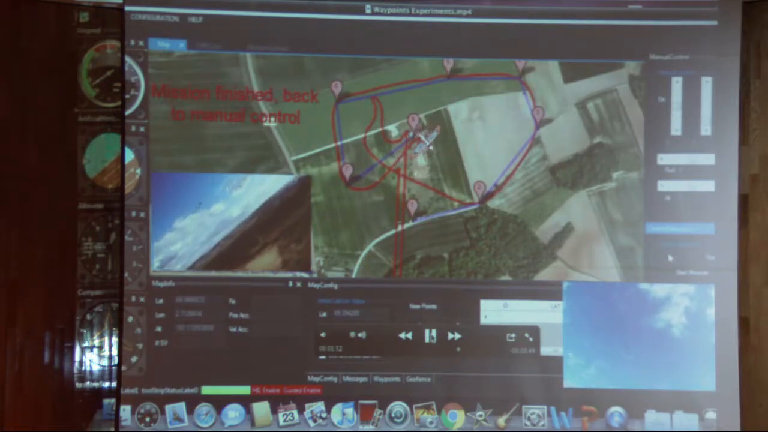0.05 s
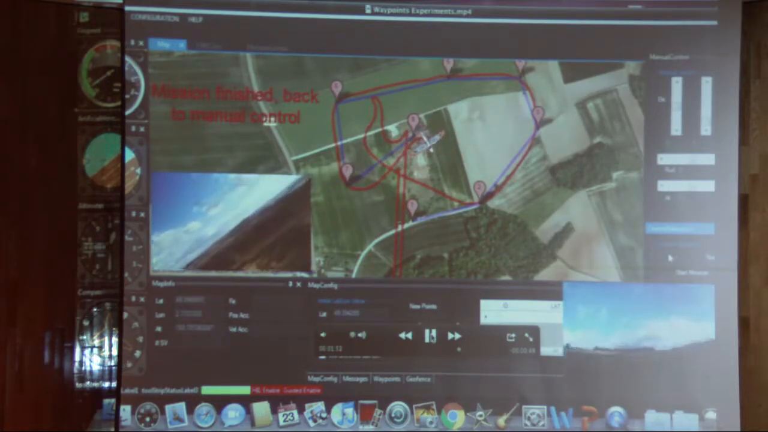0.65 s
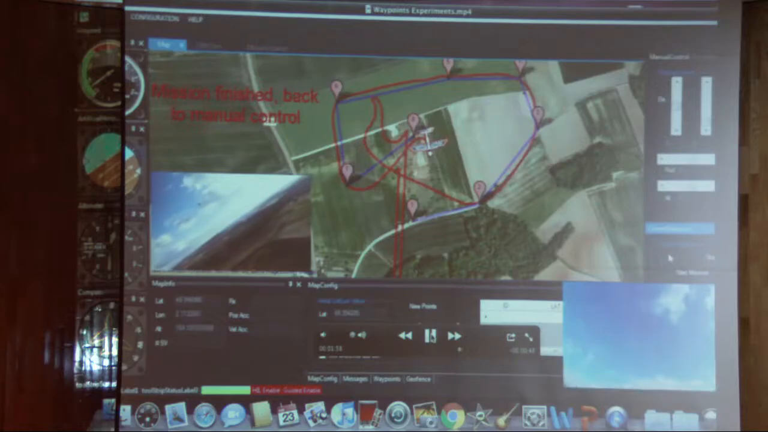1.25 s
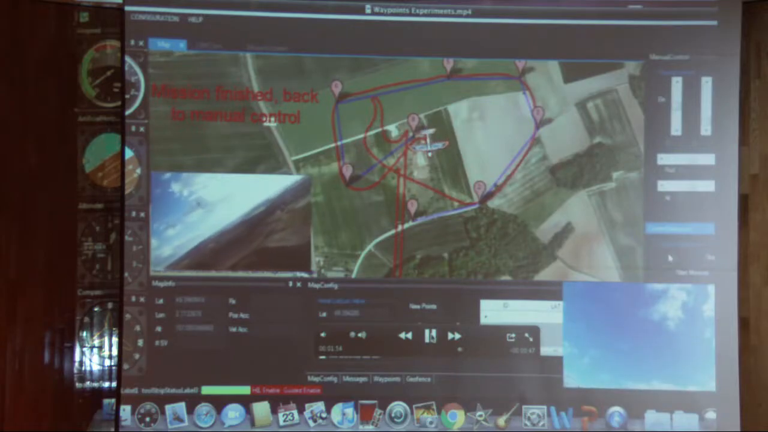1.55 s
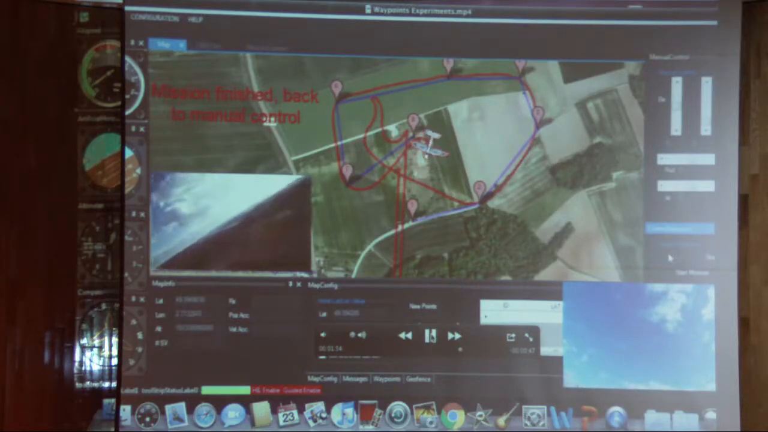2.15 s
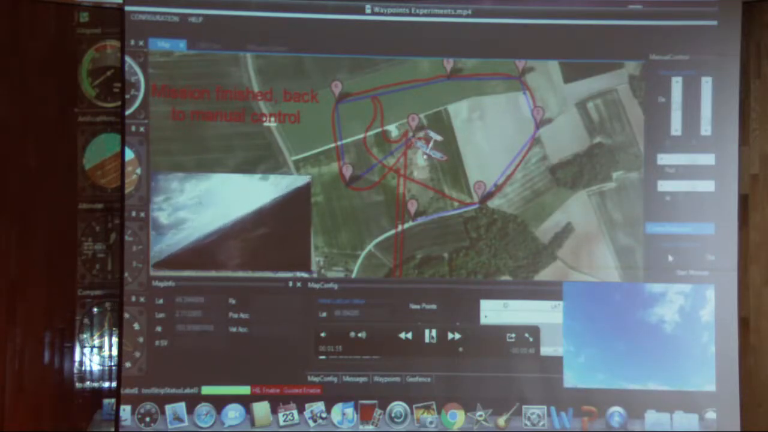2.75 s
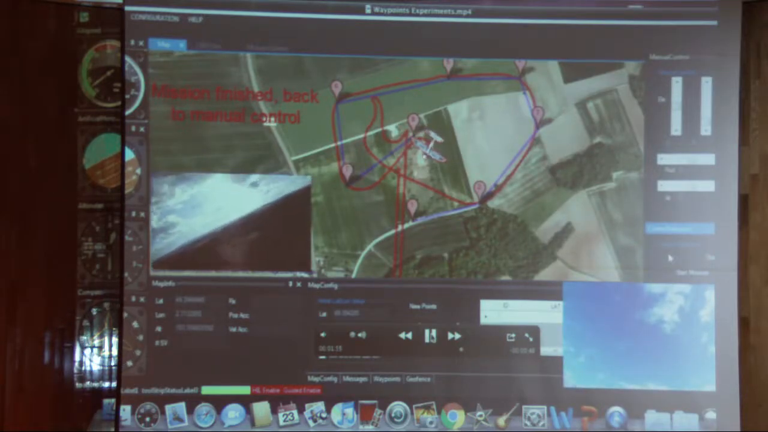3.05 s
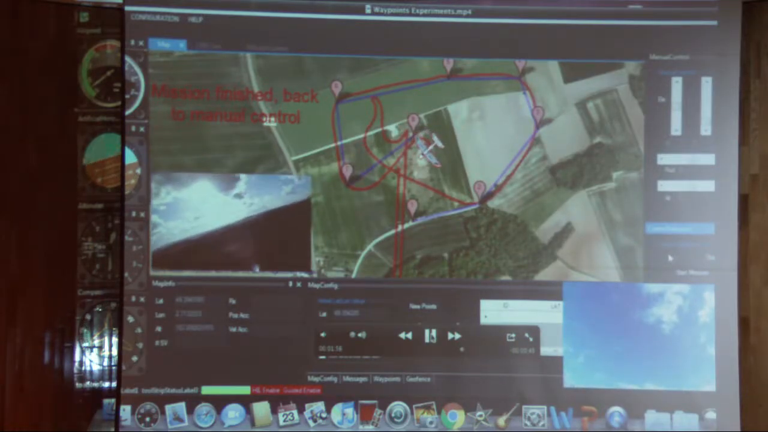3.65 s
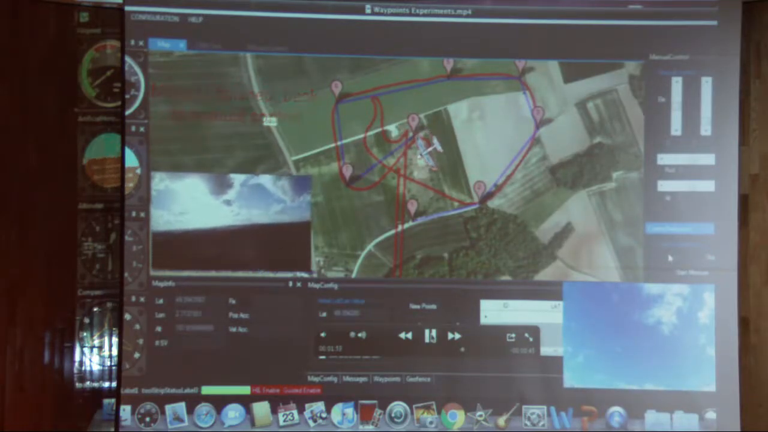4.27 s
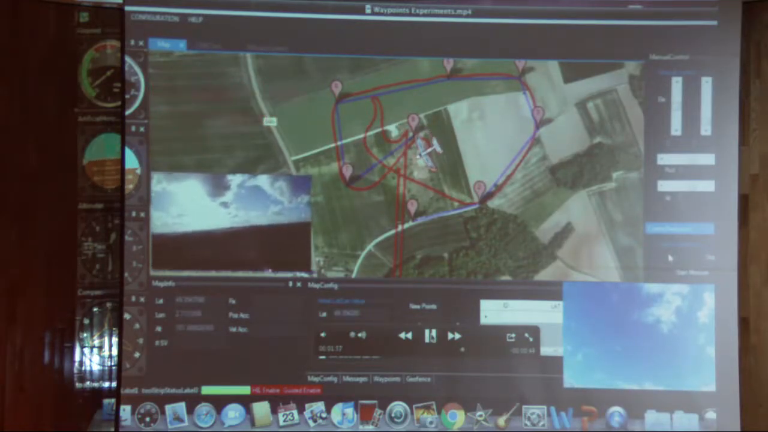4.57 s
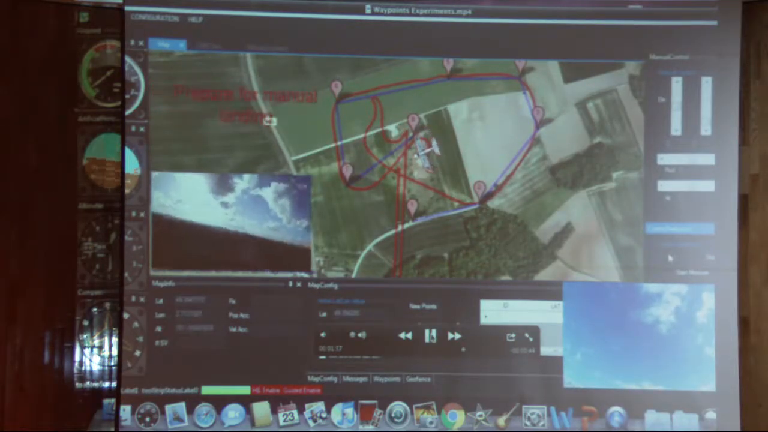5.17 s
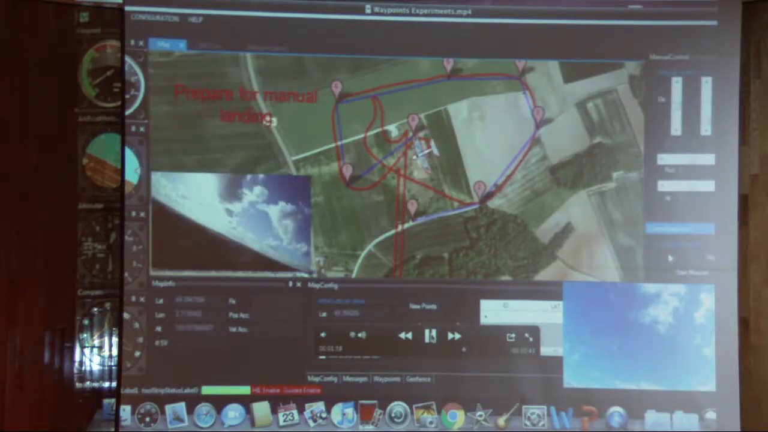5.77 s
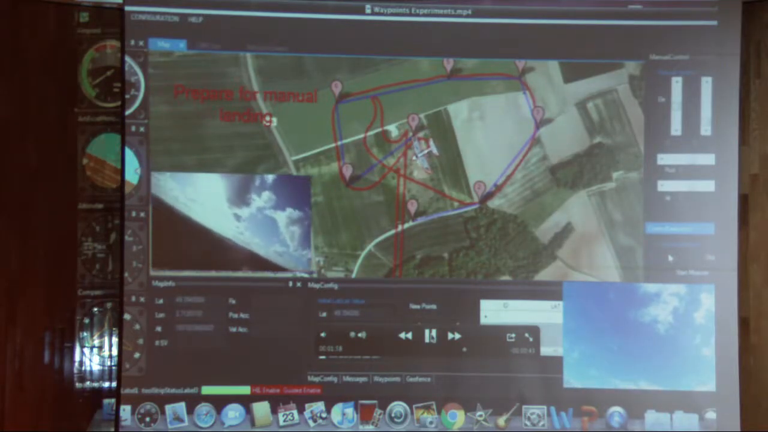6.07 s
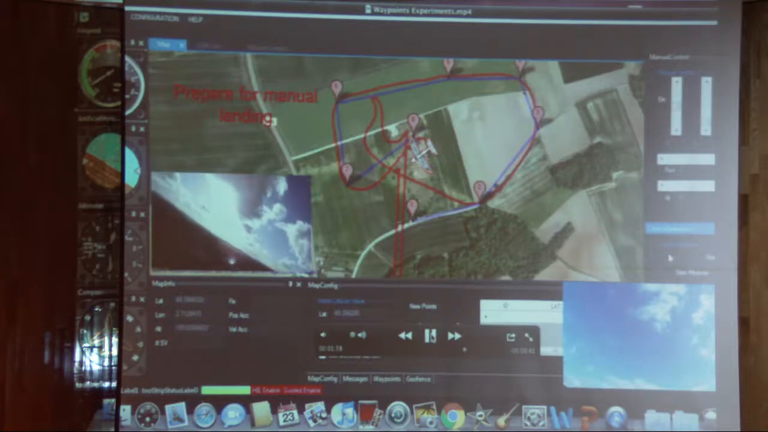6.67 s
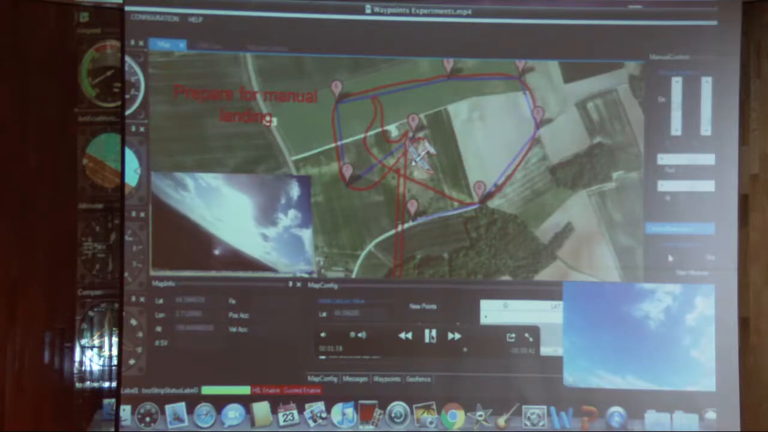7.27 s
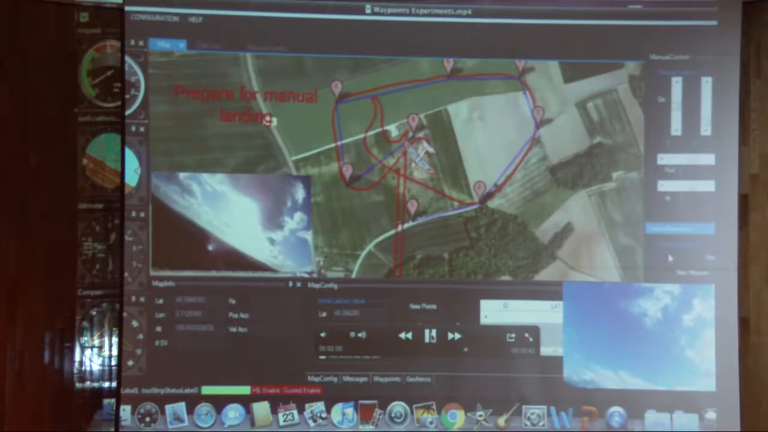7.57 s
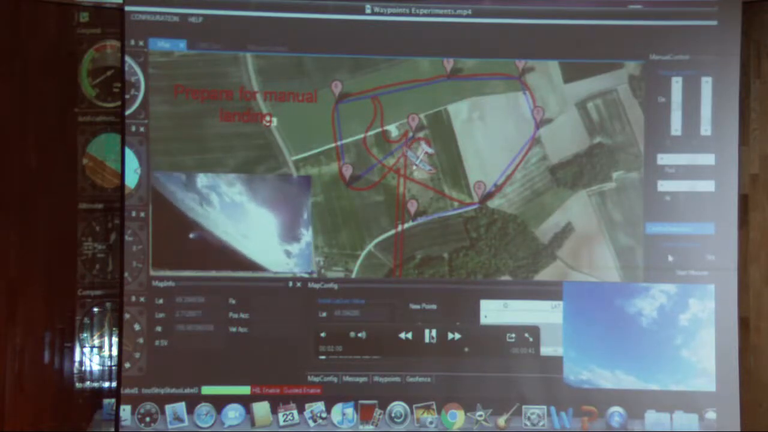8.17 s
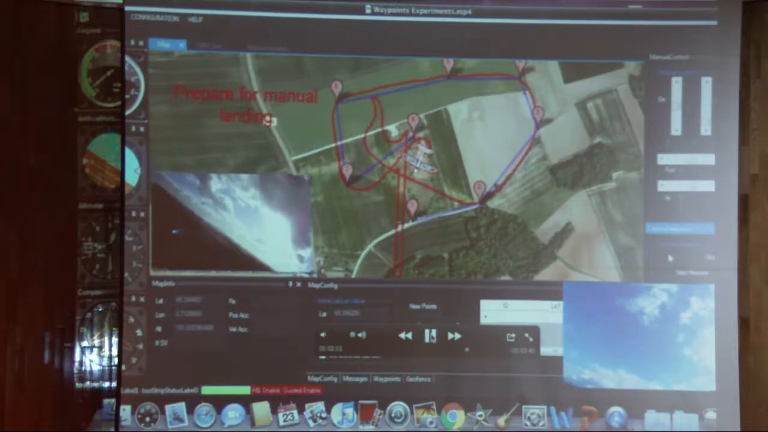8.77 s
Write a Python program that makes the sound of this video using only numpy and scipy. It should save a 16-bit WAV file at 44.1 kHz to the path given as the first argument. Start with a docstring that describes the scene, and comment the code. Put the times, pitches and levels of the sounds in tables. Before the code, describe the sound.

In a quiet lecture room, the microphone picks up steady electrical interference: a deep hum, a fine buzz and a thin high-pitched whine, all sounding together from start to finish. Beneath them are an even hiss and a soft, fast flutter of low noise. Everything stays quiet and nearly unchanged, apart from one barely audible low swell in the room toward the end.

```python
"""Mains hum in a quiet lecture room

A camera picks up the hum electrically: a rectifier conducts twice a cycle and buzzes,
and a switching supply whines in short bursts between those pulses. Under it lie a steady
hiss and a soft rasp that flutters thirty times a second, probably the camera's own frame
cycle. Near the end a faint low sound swells in the room."""
import sys
import numpy as np
from scipy.fft import rfft, irfft, next_fast_len
from scipy.io import wavfile

SR = 44100
rng = np.random.default_rng(int(sys.argv[2]) if len(sys.argv) > 2 else 0)


def transcribe(u):
    """Save the signal u as a 16-bit wav file named by the first command-line argument.

    u: samples, shape (n,) or (channels, n), limited to [-1, 1]; the rate is SR.
    q: integer samples, one column per channel.
    """
    v = np.clip(np.atleast_2d(u).T, -1, 1)
    q = np.round(v * 32767).astype(np.int16)
    wavfile.write(sys.argv[1], SR, q)


N = 397782

MAINS_HZ, WHINE_HZ, TOP_HZ = 60.00855, 7550.5, 15700
PULSE_HZ, FRAME_HZ = 2 * MAINS_HZ, MAINS_HZ / 2


def mains_hum(level_db=-55.5, sway_db=1.0, sway_s=10.7, loudest_s=7.3, lead_cycles=0.13):
    """The smooth mains tone runs just ahead of the diode pulses, and slowly swells and sinks."""
    sway = np.cos(2 * np.pi * (clock() - loudest_s) / sway_s)
    tone = np.sqrt(2) * np.cos(2 * np.pi * (MAINS_HZ * clock() + lead_cycles))
    return amp(level_db + sway_db * sway) * tone


# Switching ticks in each half cycle: centre_share, width_share, relative_height
SWITCH_TICKS = [(.403, .0055, -.59), (.658, .0073, .31)]

def diode_pulse(conduction_share=0.2842, ring_hz=1980, ring_s=0.00022, size=2048):
    """Half a cycle: the diodes pass a hump of current, which induces its slope, ending in a snap."""
    place = np.arange(size) / size
    t = place / PULSE_HZ
    attack = 1 - np.exp(-place / 0.0021)
    slope = (1 - 2 * place / conduction_share) * attack
    # the current turns over quickly at the top of the hump
    from_top = (place - conduction_share / 2) / 0.048
    turn = 0.29 * from_top * bell(from_top)
    conducting = (1 - np.tanh((place - conduction_share) / 0.00072)) / 2
    # the wiring rings for an instant as the diodes open
    ringing = 1.09 * np.sin(2 * np.pi * ring_hz * t) * np.exp(-t / ring_s)
    ticks = sum(height * bell((place - centre) / width) for centre, width, height in SWITCH_TICKS)
    return (slope - turn) * conducting - ringing + ticks


# EQ on the buzz: frequency_hz, gain_db
BUZZ_EQ = [(180, 2.5), (300, 0.74), (420, 0), (540, 1.6), (660, -6), (800, -4), (1300, 3), (1600, -3.5),
           (2800, 3), (3300, 0), (4300, -2), (4900, 0), (6000, -2), (10200, 2), (11000, -9), (15500, -15)]

def rectifier_buzz(gain_db=-40):
    """Diode pulses, one at each mains crest, run together into a buzz."""
    pulse = amp(gain_db) * diode_pulse()
    # the second half cycle mirrors the first, which leaves only odd harmonics
    harmonics = rfft(np.concatenate([pulse, -pulse]))
    hz = np.arange(len(harmonics)) * MAINS_HZ
    overtones = (hz > MAINS_HZ) & (hz < TOP_HZ)
    cycle = irfft(harmonics * amp(along(BUZZ_EQ, hz)) * overtones)
    return repeat(cycle, MAINS_HZ)


# Bright colour of a diode click: frequency_hz, gain_db
CLICK_EQ = [(4000, -37), (8000, -4), (12000, -6), (15500, -8)]

def diode_clicks(level_db=-61):
    """Each diode opens with a tiny bright click."""
    return amp(level_db) * gate(PULSE_HZ * clock(), centre=0, length=0.025) * noise(CLICK_EQ)


# The supply's bursts in each half cycle: centre_share, length_share, gain_db
SUPPLY_BURSTS = [(.416, .176, 0), (.825, .301, .6)]

def supply_drive():
    """The envelope of the switching supply, which runs twice between diode pulses."""
    pulses = PULSE_HZ * clock()
    return sum(amp(db) * gate(pulses, centre, length) for centre, length, db in SUPPLY_BURSTS)


# Faint whistles riding the bursts: pitch_hz, level_db
SUPPLY_WHISTLES = [(9426.75, -84), (9786.8, -83), (10026.83, -83), (14680.85, -88), (15040.9, -82)]

def supply_whine(gain_db=-54.5, bend_rad=1.1, warble_rad=0.51, warble_hz=1015, warble_swell_hz=80):
    """The supply sings in bursts; the ripple of its reservoir bends the pitch, which also warbles."""
    t = clock()
    place = (PULSE_HZ * t) % 1
    drive = supply_drive()
    bend = bend_rad * np.cos(2 * np.pi * (place - 0.045))
    # the warble starts anew with each diode pulse, swelling and fading
    since_s = (place - 0.037) / PULSE_HZ
    warble_depth = warble_rad * np.sin(2 * np.pi * warble_swell_hz * since_s)
    warble = warble_depth * np.cos(2 * np.pi * warble_hz * since_s)
    whine = amp(gain_db) * drive * np.cos(2 * np.pi * WHINE_HZ * t - bend - warble)
    whistles = sum(amp(db) * np.sqrt(2) * np.sin(2 * np.pi * hz * t) for hz, db in SUPPLY_WHISTLES)
    return whine + whistles * unit(drive)


# EQ on the comb around the whine: frequency_hz, gain_db
COMB_EQ = [(3000, -30), (5500, -7), (6500, -2), (7500, -8), (8800, 0), (10200, -1), (10800, -8),
           (15500, -14)]

def switching_comb(level_db=-70.5):
    """A jagged switching pattern recurs every half cycle and spreads faint lines around the whine."""
    jagged = repeat(rng.standard_normal(128), PULSE_HZ) * supply_drive()
    lines = jagged * np.cos(2 * np.pi * WHINE_HZ * clock())
    return amp(level_db) * coloured(lines, COMB_EQ)


# Thin colour of the fizz: frequency_hz, gain_db
FIZZ_EQ = [(3000, -20), (6000, -10), (7500, -13), (8500, -5), (10200, -1), (10800, -5), (15500, -10)]

def switching_fizz(gain_db=-73):
    """The switching is a little unsteady, so each burst carries a thin fizz."""
    return amp(gain_db) * supply_drive() * noise(FIZZ_EQ)


# Dark body of each puff: frequency_hz, gain_db
RASP_EQ = [(20, 1), (60, 2), (150, -6.5), (270, -4.5), (450, -4.5), (650, -12), (950, -10), (1300, -14.5),
           (1900, -16.5), (2500, -22.5), (3800, -24), (5500, -28), (12000, -44)]
# Brighter crest of each puff: frequency_hz, gain_db
CREST_EQ = [(200, -24), (500, 4), (950, -6), (1300, -5), (1950, -5), (2500, -14.5), (4000, -16.5),
            (8000, -29)]

def frame_flutter(rasp_db=-56.5, crest_db=-59.5, scatter_db=1):
    """Once a frame comes a puff of low rasping noise with a short, brighter crest."""
    frames = FRAME_HZ * clock()
    strength_db = scatter_db * rng.standard_normal(int(frames[-1]) + 2)
    strength = amp(strength_db[(frames + 0.5).astype(int)])
    body = amp(rasp_db) * gate(frames, centre=0.828, length=0.46) * noise(RASP_EQ)
    crest = amp(crest_db) * gate(frames, centre=0.749, length=0.16) * noise(CREST_EQ)
    return strength * (body + crest)


def frame_throb(dip_db=-52, fade_db=4, rise_db=-53, spacing_share=0.1117):
    """Under each puff the voltage dips three times, ever less, then rises between puffs."""
    frames = FRAME_HZ * clock()
    dips = sum(amp(dip_db - fade_db * k) * gate(frames, centre=0.674 + k * spacing_share, length=0.068)
               for k in range(3))
    voltage = amp(rise_db) * gate(frames, centre=0.27, length=0.22) - dips
    return voltage - voltage.mean()


# Cue for the low swell: peak_s, length_s, level_db
ROOM_SWELLS = [(8.62, 0.29, -61)]
# Its narrow, low colour: frequency_hz, gain_db
SWELL_EQ = [(120, -43), (210, -4), (255, 0), (290, -6), (400, -47), (1000, -85)]

def room_swell():
    """A soft, low sound rises briefly out of the room tone."""
    envelope = sum(amp(db) * bell(2 * (clock() - peak_s) / length_s)
                   for peak_s, length_s, db in ROOM_SWELLS)
    return envelope * noise(SWELL_EQ)


# Hiss in the centre: frequency_hz, gain_db
HISS_EQ = [(20, 1.5), (45, -1), (100, -14.5), (200, -6), (300, -8.5), (420, -26), (700, -18), (1200, -23),
           (2500, -21), (5000, -24), (7500, -22), (11000, -26.5), (15500, -28)]
# Very faint stereo noise, opposite in left and right: frequency_hz, gain_db
STEREO_NOISE_EQ = [(20, 5), (100, -5), (350, -35.5), (800, -15.5), (3000, -22.5), (6000, -16), (10000, -18),
                   (15500, -14.5)]

def steady_hiss(mid_db=-60, side_db=-77):
    """A steady hiss, nearly mono; beside it runs a very faint noise, opposite in left and right, brightest in
    the treble."""
    mid = amp(mid_db) * noise(HISS_EQ)
    side = amp(side_db) * noise(STEREO_NOISE_EQ)
    return np.array([mid + side, mid - side])


def amp(db):
    """Decibels to gain."""
    return 10 ** (np.asarray(db) / 20)


def unit(x):
    """x at rms 1."""
    return x / np.sqrt(np.mean(x ** 2) + 1e-20)


def along(points, hz):
    """An EQ curve read on a log frequency axis."""
    frequencies, values = np.transpose(points)
    return np.interp(np.log(hz + 1), np.log(frequencies), values)


def clock():
    """Seconds at each sample."""
    return np.arange(N) / SR


def filtered(x, response):
    """x through a frequency response."""
    size = next_fast_len(N + 8192)
    hz = np.fft.rfftfreq(size, 1 / SR)
    return irfft(rfft(x, size) * response(hz), size)[..., :N]


def coloured(x, eq):
    """x through an EQ curve, brought to rms 1."""
    return unit(filtered(x, lambda hz: amp(along(eq, hz))))


def noise(eq):
    """Coloured noise of rms 1."""
    return coloured(rng.standard_normal(N), eq)


def repeat(cycle, hz):
    """One cycle looped hz times a second."""
    return np.interp(clock() * hz, np.arange(len(cycle)) / len(cycle), cycle, period=1)


def bell(x):
    """A smooth bump of height 1 at x = 0."""
    return np.exp(-np.square(x))


def gate(cycles, centre, length):
    """A round-shouldered window once a cycle; centre and length are shares of the cycle."""
    away = (cycles - centre + 0.5) % 1 - 0.5
    return bell(np.square(2 * away / length))


def scene():
    """The electrical sounds reach both channels alike; only the hiss has width."""
    hum = mains_hum() + rectifier_buzz() + diode_clicks()
    supply = supply_whine() + switching_comb() + switching_fizz()
    return hum + supply + frame_flutter() + frame_throb() + room_swell() + steady_hiss()


def record(dry):
    """The camera keeps nothing above its band limit."""
    return filtered(dry, lambda hz: hz < TOP_HZ)


dry = scene()
out = record(dry)
transcribe(out)
```